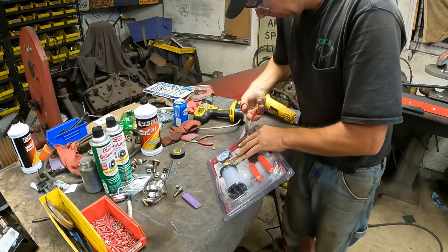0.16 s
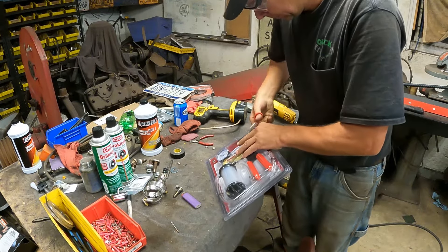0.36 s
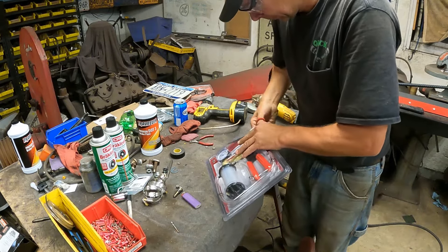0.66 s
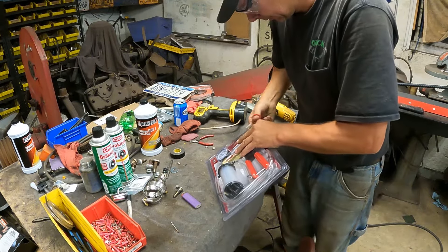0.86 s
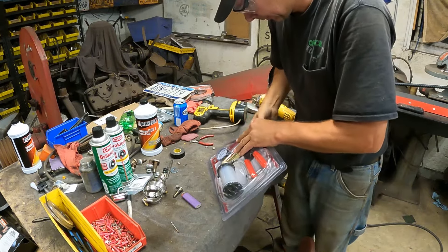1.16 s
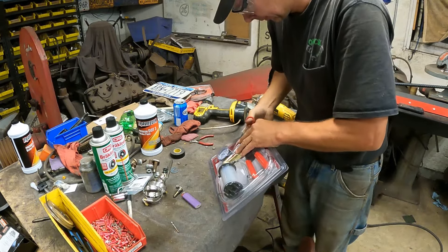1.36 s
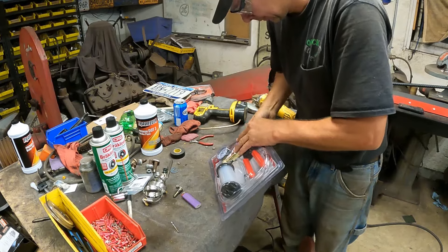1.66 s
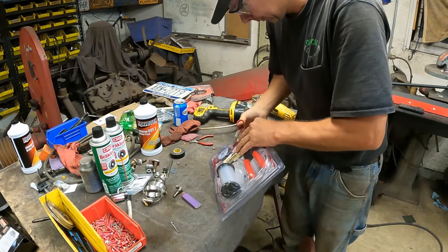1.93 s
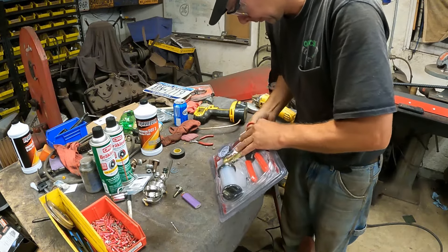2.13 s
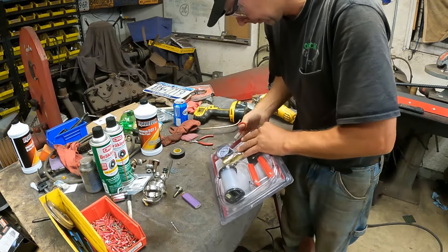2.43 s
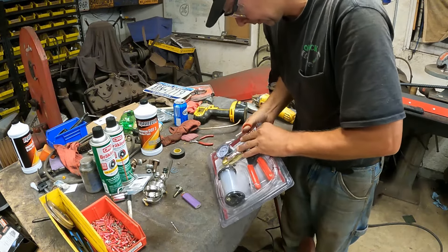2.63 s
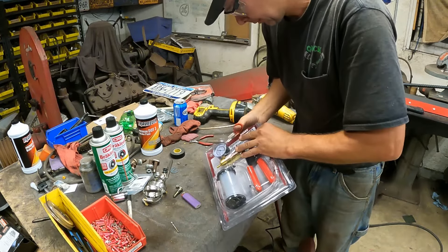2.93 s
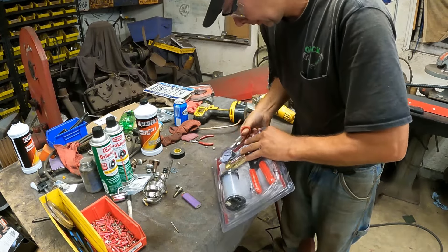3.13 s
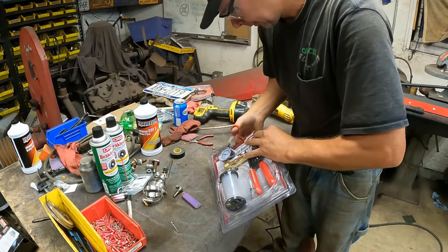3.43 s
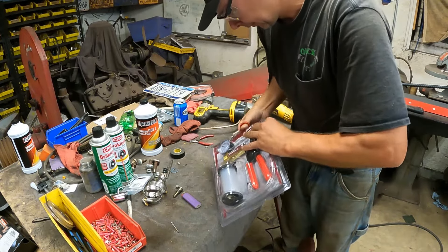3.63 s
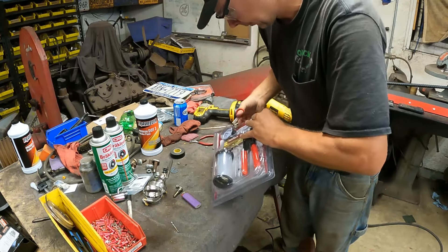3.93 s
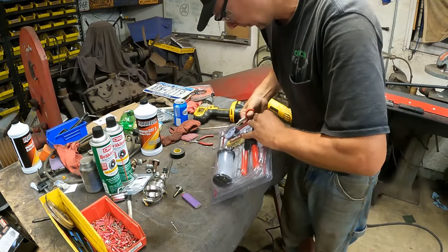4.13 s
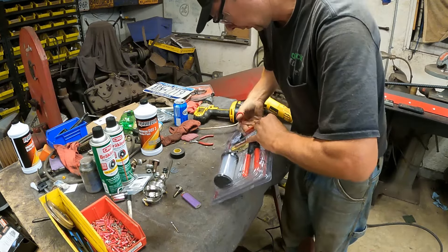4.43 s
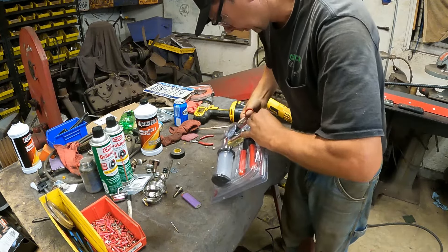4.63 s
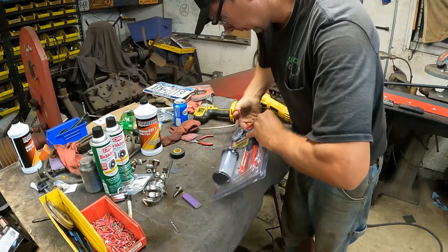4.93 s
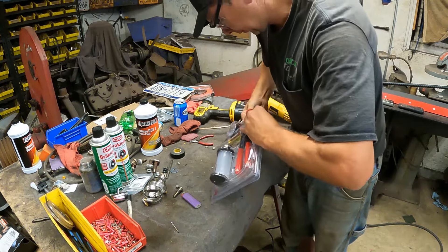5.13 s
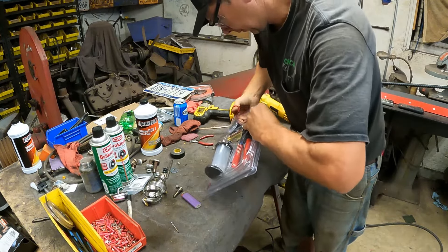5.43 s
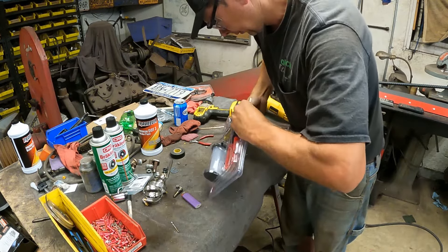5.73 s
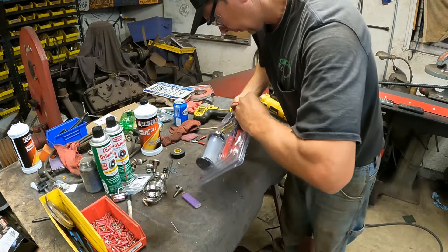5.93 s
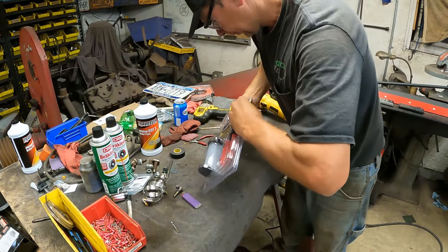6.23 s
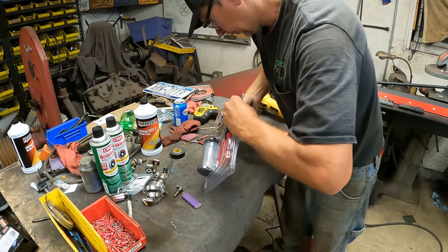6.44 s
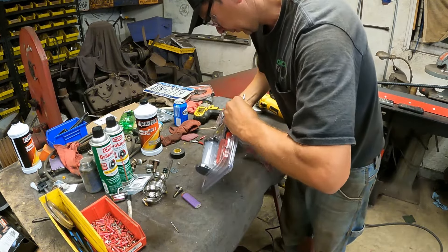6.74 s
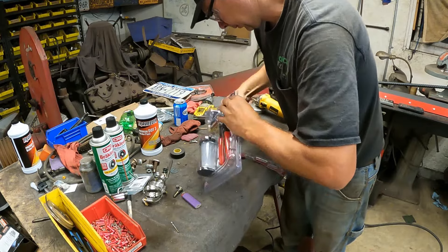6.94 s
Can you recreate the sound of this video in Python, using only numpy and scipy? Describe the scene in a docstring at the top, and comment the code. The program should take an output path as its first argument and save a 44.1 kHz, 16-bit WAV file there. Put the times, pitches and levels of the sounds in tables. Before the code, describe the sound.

Irregular hard snaps and hollow buckling pops of a plastic blister pack being cut open, with light crinkling and soft bench knocks.

```python
"""A pack crinkles in the hands, then sharp cracks as hand cutters bite round a stiff plastic clamshell.
Cracks and pops are short resonant pulses with a shell thump; creaks are trains of slips.
Crinkle, fizz and drag are showers of tiny grains shaped by hand strokes; soft knocks are low pulses.
A small, cluttered workshop answers through shifting noise tails, over faint still air."""
import sys
import numpy as np
from scipy import signal
from scipy.fft import rfft, irfft
from scipy.io import wavfile
from scipy.ndimage import uniform_filter1d, minimum_filter1d

SR = 44100
rng = np.random.default_rng(int(sys.argv[2]) if len(sys.argv) > 2 else 0)


def output_pcm(signal):
    """Save a mono or channel-first signal as 16-bit PCM at the path in sys.argv[1].

    Samples are clipped to [-1, 1] before scaling.
    """
    pcm = np.clip(np.atleast_2d(signal).T, -1, 1) * 32767
    wavfile.write(sys.argv[1], SR, np.round(pcm).astype(np.int16))


N = 312669
TAPS = 4096  # length of a pulse, samples
HZ = np.fft.rfftfreq(TAPS, 1 / SR)
POP_ROOM_DB = -7.5  # room send of every pop, and the reference for how far a crack faces away


def amp(db):
    """Decibels to gain."""
    return 10 ** (np.asarray(db) / 20)


def unit(x):
    """Scales to energy 1."""
    return x / np.sqrt(np.sum(x ** 2) + 1e-20)


def evened(x):
    """Scales to rms 1."""
    return x / np.sqrt(np.mean(x ** 2) + 1e-20)


def read(points, hz=HZ):
    """Reads a table of values against frequency on a log-frequency axis."""
    f, value = np.transpose(points)
    return np.interp(np.log(hz + 1), np.log(f), value)


def add(mix, s, sound):
    """Mixes a sound in at time s."""
    part = mix[max(round(s * SR), 0):][:len(sound)]
    part += sound[:len(part)]


def through(x, response):
    """Convolves and keeps the length."""
    return signal.oaconvolve(x, response)[:len(x)]


def hump(hz, octaves):
    """A bell-shaped spectrum round hz on a log-frequency axis, scaled to energy 1."""
    return unit(np.exp(-(np.log2((HZ + 1) / hz) / (2 * octaves)) ** 2))


def click(gain):
    """The most abrupt causal (minimum-phase) pulse that has this spectrum."""
    log_gain = np.log(np.maximum(gain, gain.max() * 1e-4))
    circle = np.concatenate([log_gain, log_gain[-2:0:-1]])
    return np.fft.ifft(np.exp(np.conj(signal.hilbert(circle)))).real


def bend(pulse, lag_s=0.000502):
    """Bending waves are dispersive: the low notes arrive last (about lag_s at 1 kHz)."""
    delay = lag_s * np.sqrt(1000 / (HZ + 100))
    phase = 2 * np.pi * np.cumsum(delay) * HZ[1]
    return irfft(rfft(pulse) * np.exp(-1j * phase))


def scatter(db, fade_s):
    """An impulse, then a noisy tail like bending waves that bounce round the sheet and die."""
    t = np.arange(TAPS) / SR
    swell = np.exp(-t / fade_s) * (1 - np.exp(-2 * t / fade_s))
    waves = amp(db) * unit(rng.standard_normal(TAPS) * swell)
    waves[0] = 1
    return waves


def ringing(modes, detune=0.011):
    """Damped modes, each slightly detuned and at a random phase on every call."""
    t = np.arange(2 * TAPS) / SR
    ring = np.zeros(len(t))
    for hz, db, t60 in modes:
        pitch = hz * (1 + detune * rng.uniform(-1, 1))
        ring += amp(db - 60 * t / t60) * np.sin(2 * np.pi * (pitch * t + rng.random()))
    return unit(ring * (1 - np.exp(-t / 0.00037)) ** 2)


# modes of the hollow shell on the bench: [f/Hz, level/dB, t60/s]
SHELL_MODES = [(145, -9, 0.14), (212, -2.5, 0.062), (292.5, -8, 0.3), (418.4, 4, 0.1), (536, 5, 0.073),
               (672, 13, 0.047), (869, -7.5, 0.24)]


def shell(ring_db=-3):
    """A dull push on the pack, followed by the ring of its hollow modes."""
    push = unit(click(hump(593, 0.72) + 0.00025))
    return unit(push + amp(ring_db) * ringing(SHELL_MODES)[:TAPS])


def breaks(rows, scatter_db, fade_s, thump_db, edge_db, edge_hz, edge_octaves, wet_db, damping=0.099,
           off_axis=0.24):
    """Sudden releases of the bent sheet; returns the direct sound and what goes into the room."""
    out = np.zeros((2, N))
    for s, db, hz, octaves, patch_hz, patch_db, shell_db, room_db in rows:
        colour = np.hypot(hump(hz, octaves), amp(edge_db) * hump(edge_hz, edge_octaves))
        # the patch that lets go rings for a few cycles at its own pitch
        patch = amp(patch_db / (1 + ((HZ / patch_hz - 1) / damping) ** 2))
        crack = unit(bend(click(colour * patch))) * rng.choice([-1, 1])
        thump = amp(shell_db + thump_db) * shell()
        # a crack that faces away is both more scattered and more reverberant
        waves = scatter(scatter_db + off_axis * (room_db - POP_ROOM_DB), fade_s)
        add(out[0], s, amp(db) * (unit(through(crack, waves)) + thump))
        # the whole pack radiates into the room, so the patch stands out less there
        radiated = unit(click(colour * np.sqrt(patch)))
        add(out[1], s, amp(db + room_db + wet_db) * (radiated + thump))
    return out


# hand strokes that shift the pack; levels are before the layer trims in rubbing():
# [t/s, length/s, crinkle level/dB, shell rumble level/dB, fizz level/dB]
HAND_STROKES = [(0.0, 0.026, -32.5, -38, -34.5), (0.395, .14, -38.5, -43.5, -43),
                (0.57, 0.31, -41, -46.5, -46.5), (0.967, 0.34, -39.5, -41, -44.5),
                (1.412, 0.13, -36.5, -39, -40.5), (1.714, 0.042, -30.5, -26.5, -37),
                (1.9, 0.094, -37, -41, -40.5), (2.375, 0.07, -34, -43.5, -44),
                (2.437, 0.066, -31, -37.5, -39), (2.624, 0.12, -44, -53, -49),
                (2.871, .13, -37, -48.5, -40.5), (3.119, 0.39, -35, -42.5, -42.5),
                (3.601, .2, -40.5, -46.5, -43), (3.876, 0.11, -37.5, -41, -36.5),
                (4.076, 0.21, -37.5, -49.5, -35), (4.404, 0.063, -39.5, -54, -41),
                (4.482, .06, -32, -46, -32.5), (4.56, 0.17, -36, -48.5, -39.5),
                (4.888, 0.033, -39.5, -43, -52), (4.955, 0.084, -33, -40, -41),
                (5.093, 0.096, -34.5, -44, -40), (5.27, 0.08, -40.5, -52, -36),
                (5.407, 0.15, -39, -42.5, -48), (5.566, 0.024, -40, -58, -40), (5.698, .2, -39, -41.5, -42),
                (5.958, 0.2, -41, -45, -43), (6.328, 0.19, -39, -54, -42), (6.627, 0.032, -44, -56, -45),
                (6.673, 0.083, -38.5, -46.5, -37), (6.894, 0.092, -34.5, -42, -33.5),
                (7.018, 0.057, -38.5, -52, -39)]
STROKE_ATTACK_S, STROKE_RELEASE_DB_PER_S = 0.015, 228


def handling():
    """Gains of crinkle, rumble and fizz: each stroke builds, holds and dies away."""
    t, power = np.arange(SR) / SR, np.zeros((3, N))
    for s, length, *levels_db in HAND_STROKES:
        release = amp(-STROKE_RELEASE_DB_PER_S * np.maximum(t - length, 0))
        shape = np.minimum(t / STROKE_ATTACK_S, 1) * release
        for layer, db in zip(power, levels_db):
            add(layer, s, (amp(db) * shape) ** 2)
    return np.sqrt(power)


# end level relative to the break and before the crinkle trim, slope of the swell, length
SWELL_DB, SWELL_DB_PER_S, SWELL_S = -46.5, 903, 0.027


def onset_swell():
    """Gain of a brief crinkle that swells into each crack and pop, softening its onset."""
    t, power = np.arange(0, SWELL_S, 1 / SR), np.zeros(N)
    for s, db, *_ in CRACKS + BUCKLES:
        add(power, s - SWELL_S, amp(db + SWELL_DB - SWELL_DB_PER_S * t[::-1]) ** 2)
    return np.sqrt(power)


# level relative to the break plus its tabled thump, rise time, slope of the decay
SHUDDER_DB, SHUDDER_RISE_S, SHUDDER_DB_PER_S = -26, 0.0084, 247


def shudder():
    """Gain of the shell's rattle on the bench after each crack and pop, in step with its thump."""
    t, power = np.arange(SR // 2) / SR, np.zeros(N)
    shape = np.minimum(t / SHUDDER_RISE_S, 1) * amp(SHUDDER_DB - SHUDDER_DB_PER_S * t)
    blows = [(s, db + thump_db) for s, db, *_, thump_db, _ in CRACKS]
    blows += [(s, db + thump_db) for s, db, *_, thump_db in BUCKLES]
    for s, db in blows:
        add(power, s, (amp(db) * shape) ** 2)
    return np.sqrt(power)


def grains(colour, per_s, spread_db, octaves, count=12):
    """Tiny slips of uneven size; each patch of plastic favours its own pitch."""
    out = np.zeros(N)
    for hz in np.geomspace(1000, 6000, count):
        sizes = amp(spread_db * np.minimum(rng.exponential(1, N), 4)) * rng.choice([-1, 1], N)
        slips = sizes * (rng.random(N) < per_s / count / SR)
        grain = unit(click(amp(read(colour)) * (hump(hz, octaves) + 0.012)))
        out += through(slips, grain)
    return evened(out)


# spectrum of the flexing sheet: [f/Hz, level/dB]
CRINKLE_COLOUR = [(150, -39), (500, 2), (900, 1), (1600, 3), (2700, -0.5), (4000, -4), (6000, -19),
                  (12000, -21)]
# spectrum of the sliding fizz: [f/Hz, level/dB]
FIZZ_COLOUR = [(1500, -56), (3200, -2.5), (4500, 0.5), (6500, -1.5), (10000, -5), (16000, -14)]
# spectrum of the shell dragged on the bench: [f/Hz, level/dB]
DRAG_COLOUR = [(25, -71), (60, -12), (105, -17), (150, -2), (300, 6), (600, 6.5), (900, 3), (2000, -32.5)]
GRIP_DB = -56  # faint crinkle while the pack is merely held, before the crinkle trim


def rubbing(crinkle_db=-1, fizz_db=-4, rumble_db=-2, wet_db=-3, fine_db=-5.5, ticks_per_s=130):
    """The pack crinkles and ticks in the grip and drags on the bench, which shakes its shell."""
    flex, push, slide = handling()
    flex = np.sqrt(flex ** 2 + onset_swell() ** 2 + amp(GRIP_DB) ** 2)
    ticks = through(grains(CRINKLE_COLOUR, ticks_per_s, 2.3, 0.9), unit(scatter(-5, .001)))
    fine = amp(fine_db) * grains(CRINKLE_COLOUR, 900, 1.2, 0.77)
    crinkle = flex * amp(crinkle_db) * (fine + ticks)
    fizz = slide * amp(fizz_db) * grains(FIZZ_COLOUR, 420, 2.4, 1.18)
    bumps = rng.standard_normal(N) * (rng.random(N) < 500 / SR)  # about 500 per s
    drag = evened(through(bumps, click(amp(read(DRAG_COLOUR)))))
    out = crinkle + fizz + np.hypot(amp(rumble_db) * push, shudder()) * drag
    return np.array([out, amp(wet_db) * out])


# cracks of the sheet; thump is relative to the crack, thump and room before the offsets in snapping():
# [t/s, level/dB (energy), centre f/Hz, patch f/Hz, patch level/dB, shell thump level/dB, room level/dB]
CRACKS = [(0.1639, -8.5, 2050, 2950, 0, -33, -1.5), (0.238, 10, 2900, 4070, 6, -23, 0.5),
          (0.2417, 16.5, 2580, 1820, 7.5, -19, -9.5), (0.3718, 1.5, 2500, 2970, 8, -29, -1),
          (0.3821, 6, 1980, 3740, 16, -49, 1.5), (0.385, 9, 2740, 3740, 14, -18, -4.5),
          (0.45, -7, 2300, 3290, 17, -25, -13), (0.6777, -12.5, 2400, 2040, 12, -15, 1.5),
          (0.8412, -1, 2360, 3800, 2, -11.5, -4), (0.8773, -6, 1840, 2740, 7, -16, -10),
          (0.9545, -0.5, 2920, 4030, 8, -28, -2), (1.0693, 7.5, 2200, 1390, 9, -16, -16),
          (1.0784, 6, 2050, 3340, 11.5, -38, -3.5), (1.2976, 15, 2560, 3600, 4.5, -10, -13),
          (1.3032, 12.5, 1730, 2510, 1, -14, -1.5), (1.7681, -0.5, 1010, 1340, 8, -5, -15),
          (1.8033, 4.5, 2130, 1520, 8.5, -18.5, -8.5), (1.9233, -3, 1420, 1320, 10, -5, 0),
          (1.9543, -5, 1200, 1310, 18, -3, -6), (2.125, -14, 2330, 2190, 11, -10, 0),
          (2.1863, -1, 1610, 1330, 14, -8.5, 1), (2.2235, 2.5, 1310, 890, 8, -8, -4.5),
          (2.3124, -8.5, 2770, 3780, 1, -16, -1.5), (2.4515, 1, 1970, 2130, 14, -25, -1),
          (2.5975, 0.5, 1970, 1490, 12, -12.5, -6), (2.6656, 5.5, 1900, 4300, 16, -14, -4.5),
          (2.678, 12, 1970, 1680, 9, -27, -6), (2.688, 7.5, 1630, 1660, 9, -12.5, -13),
          (2.82, -11.5, 1900, 2930, 7, -26, -4), (3.1548, -1.5, 2160, 1400, 17, -9, 2),
          (3.1719, 8.5, 2470, 2790, 19, -24, -7), (3.21, 7.5, 1680, 2730, 4, -21, -18),
          (3.2569, 14, 1440, 1460, 0, -19.5, -9), (3.349, -1.5, 2200, 2920, 15, -37, -1),
          (3.3926, 7.5, 1760, 2910, 8.5, -16, -4.5), (3.625, -1.5, 3760, 3580, 4, -12.5, -6),
          (3.7245, -5, 2020, 2130, 13, -33, -24), (3.8868, -5.5, 1550, 1690, 5, -19, -1),
          (4.1625, 1, 1880, 1560, 3, -23, -2), (4.2175, 9, 2700, 2280, 6, -26, -5),
          (4.2399, 9.5, 1930, 2700, 9, -25, -9), (4.2644, 15.5, 2060, 2430, 11, -26.5, -12),
          (4.474, -1, 2100, 1470, 8, -13.5, 1.5), (5.1512, -0.5, 2680, 2270, 9, -9.5, -5),
          (5.2586, 5, 1650, 1814, 3, -9.5, 1.5), (5.5803, 9, 1540, 2600, 11.5, -17, -7),
          (5.7255, -4, 1800, 1900, 10, -14, -11), (5.755, 4.5, 2350, 3600, 6, -28, -0.5),
          (6.181, -4, 3000, 1820, 6, -22, -11), (6.3687, 8, 2610, 1000, 18, -14.5, 0),
          (6.3965, 1, 1870, 2300, 5, -26, -9), (6.4484, 12.5, 2110, 1360, 6.5, -12, -2),
          (6.7965, -2.5, 2480, 2600, 11, -16, -5.5), (6.8891, 18, 2510, 2590, 7, -20, -5.5),
          (6.9, 8.5, 3900, 5370, 6, -13, -12)]
CRACK_OCTAVES = 0.72  # spread of every crack's main hump


def snapping():
    """Sharp, wide cracks as the blades bite through the sheet."""
    rows = [(s, db, hz, CRACK_OCTAVES, *rest) for s, db, hz, *rest in CRACKS]
    return breaks(rows, scatter_db=0.0, fade_s=0.0029, thump_db=4.5,
                  edge_db=-14.5, edge_hz=3250, edge_octaves=0.93, wet_db=1.2)


# stick-slip runs of the blade: [t/s, length/s, first rate/(slips per s), last rate/(slips per s),
# first slip level/dB, last slip level/dB, centre f/Hz, spread/octaves]
STICK_SLIPS = [(0.403, .016, 275, 250, -4, -7.5, 2780, 0.58), (0.7164, .042, 56, 50, -6.5, -4, 2200, .5),
               (0.7632, .028, 91, 80, -4, -8, 2400, .45), (2.471, 0.036, 160, 110, -9, -22, 2200, 0.81),
               (3.219, .014, 340, 210, -9, -15, 2200, 0.75), (3.7501, .012, 125, 170, 3, 1, 2350, .24),
               (3.763, .03, 245, 265, -1, -4.5, 2280, .19), (3.798, .026, 190, 110, -13, -15, 4200, 0.9),
               (4.683, 0.012, 950, 950, -3.5, 9, 1990, 0.37), (4.6943, .01, 800, 430, -1.5, -7, 2100, 0.65),
               (5.437, 0.019, 233, 265, -5.5, -8, 3100, 0.9),
               (5.496, 0.013, 300, 430, -3.5, -11, 2910, 0.85),
               (5.759, 0.024, 380, 420, -7, -21, 3280, 0.75),
               (5.883, 0.034, 213, 230, -8, -11.5, 2680, 0.75),
               (7.041, 0.033, 230, 280, -13, -16, 2150, 0.11)]


def creaks(wet_db=-6, edge_db=-5, body_db=-19):
    """The blade sticks and slips: trains of slips, each one ringing the same patch of sheet."""
    out = np.zeros(N)
    jitter_s = .00012
    for s, length, rate0, rate1, db0, db1, hz, octaves in STICK_SLIPS:
        edge = amp(edge_db) * hump(2980, 0.67)
        body = amp(body_db) * hump(670, 1.0)
        slip = unit(through(bend(click(hump(hz, octaves) + edge + body)), scatter(-6, .001)))
        done = 0  # fraction of the run
        while done < 1:
            size = amp(db0 + done * (db1 - db0) + rng.standard_normal())  # uneven by about 1 dB
            add(out, s + done * length + jitter_s * rng.standard_normal(), size * slip)
            done += 1 / (length * (rate0 + done * (rate1 - rate0)))
    return np.array([out, amp(wet_db) * out])


# bumps of the pack on the bench: [t/s, level/dB (energy), centre f/Hz, spread/octaves]
BENCH_BUMPS = [(1.231, -8.5, 302, 0.26), (1.805, -8.5, 172, 0.92), (2.225, -7, 153, 0.8),
               (2.499, -8, 390, 0.45), (3.261, -1, 232.5, 0.61), (4.017, -9.5, 555, 0.65),
               (4.568, -20, 360, 0.79), (5.83, -3, 262, 0.35), (6.681, -7, 181, 0.78),
               (6.705, -12, 145, 0.64), (6.724, -19, 111.5, 0.58), (6.994, -10, 200, 0.82)]


def knocks(wet_db=0):
    """Soft, low bumps through the bench top."""
    out = np.zeros(N)
    for s, db, hz, octaves in BENCH_BUMPS:
        add(out, s, amp(db) * unit(click(hump(hz, octaves))))
    return np.array([out, amp(wet_db) * out])


# buckles of the blister; thump is relative to the pop, before the offset in buckling():
# [t/s, level/dB (energy), centre f/Hz, spread/octaves, patch f/Hz, patch level/dB, shell thump level/dB]
BUCKLES = [(1.6376, 11, 1210, 0.71, 1400, 10.5, -13), (2.9737, 9, 1350, 0.46, 1400, 14, -15.5),
           (3.1263, 1, 710, 0.84, 1250, 7, -13.5), (3.664, 4, 880, 0.77, 1630, 3.5, -13),
           (4.191, 5.5, 1360, 0.45, 1500, 15, -18.5), (4.5675, 6, 920, 0.75, 1110, 10.5, -20),
           (4.7389, 10.5, 1420, 0.26, 1640, 10, -22.5), (5.0487, 5, 1370, 0.44, 1110, 16, -16),
           (5.2865, 12.5, 1580, 0.33, 1645, 13, -28), (5.6706, 1.5, 938, 0.49, 1130, 10, -14),
           (5.7907, 11.5, 1490, 0.29, 1650, 12, -17.5)]
# modes of the taut dome that rings on after a pop: [f/Hz, level/dB, t60/s]
DOME_MODES = [(684, 8, 0.051), (1690, -16, 0.5), (1725, -3, 0.075), (1796, 15, 0.077)]


def buckling(dome_db=-19):
    """Clean pops of a few quick cycles; those near the dome's own pitch set it ringing most."""
    rows = [(*row, POP_ROOM_DB) for row in BUCKLES]
    direct, sent = breaks(rows, scatter_db=-13, fade_s=0.0034, thump_db=8.5,
                          edge_db=-12, edge_hz=3000, edge_octaves=0.62, wet_db=1.5)
    dome = through(direct, ringing(DOME_MODES, detune=0.0026))
    return np.array([direct + amp(dome_db) * dome, sent])


# reverberation time of the workshop: [f/Hz, t60/s]
WORKSHOP_DECAY = [(150, 0.36), (400, 0.25), (1000, 0.36), (2800, 0.3), (7000, 0.36), (14000, 0.35)]


def room_tail(gap_s=0.0028, build_s=0.00043):
    """Dense reflections off bench, shelves and walls; each band dies at its own rate."""
    t = np.arange(SR // 2) / SR
    taps = rng.standard_normal(len(t)) * (rng.random(len(t)) < 5000 / SR)
    taps *= 1 - np.exp(-np.maximum(t - gap_s, 0) / build_s)
    hz, at, z = signal.stft(taps, SR, nperseg=256)
    decay = amp(-60 * at / read(WORKSHOP_DECAY, hz)[:, None])
    return unit(signal.istft(z * decay, SR, nperseg=256)[1])


def workshop(x, count=3):
    """The reflections change as the pack turns in the hands: tails take turns in a slow cycle."""
    turn = 2 * np.pi * 0.4102 * np.arange(N) / SR
    out = np.zeros(N)
    for k in range(count):
        out += through(x * np.cos(turn + np.pi * k / count), room_tail())
    return out * np.sqrt(2 / count)


# spectrum of the quiet room: [f/Hz, level/dB]
AIR_COLOUR = [(20, -20), (90, -20), (150, -9), (400, 11), (1500, -8.5), (5000, -12.5), (16000, -18)]
AIR_DB = -55  # rms before the microphone


def still_air():
    """The still room: steady noise coloured by a filter."""
    return amp(AIR_DB) * evened(through(rng.standard_normal(N), click(amp(read(AIR_COLOUR)))))


def scene():
    """All sources sit in the middle, over a very quiet room."""
    direct, sent = rubbing() + snapping() + creaks() + knocks() + buckling()
    return np.tile(direct + workshop(sent) + still_air(), (2, 1))


# response of the microphone, with its port notch: [f/Hz, level/dB]
MICROPHONE_RESPONSE = [(20, -19), (70, -9), (105, -13), (145, -3), (1000, 0), (5000, -1), (7000, -4),
                       (8000, -9), (8700, -14.5), (9050, -22.5), (9500, -11.5), (10500, -7.5),
                       (12500, -18.5), (16000, -29)]
EDGE_HZ = 15700  # final low-pass


def record(dry, ceiling=0.91, apart_db=-2):
    """A small microphone and a fast limiter steered by the mid."""
    mid = through(dry[0], click(amp(read(MICROPHONE_RESPONSE))))
    top = signal.sosfilt(signal.butter(5, 11800, "high", fs=SR, output="sos"), mid)
    # scattered and turned a quarter cycle: a wide, noisy top treble between the channels
    noisy_top = through(top, unit(scatter(9.4, 0.0024)))
    side = amp(apart_db) * np.imag(signal.hilbert(noisy_top))
    allowed = np.minimum(1, ceiling / (abs(mid) + 1e-9))
    gain = uniform_filter1d(minimum_filter1d(allowed, size=31), size=31)
    pair = gain * np.array([mid + side, mid - side])
    low_pass = signal.firwin(255, EDGE_HZ, window=("kaiser", 8), fs=SR)
    return signal.oaconvolve(pair, low_pass[None], "same")


dry = scene()
out = record(dry)
output_pcm(out)
```